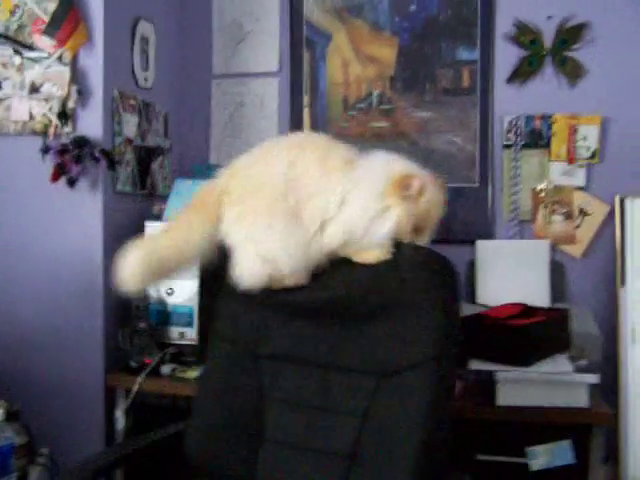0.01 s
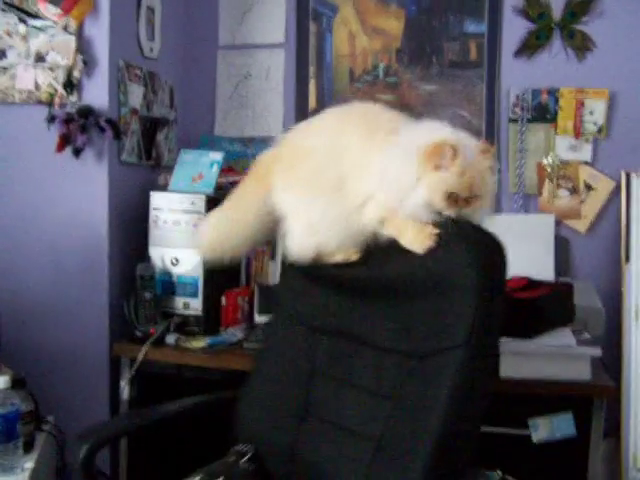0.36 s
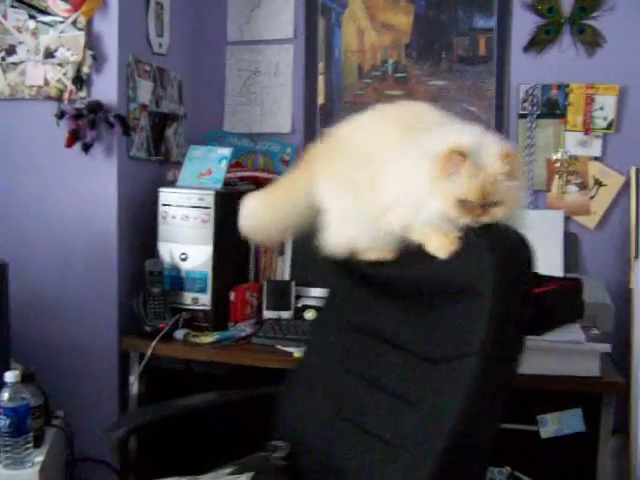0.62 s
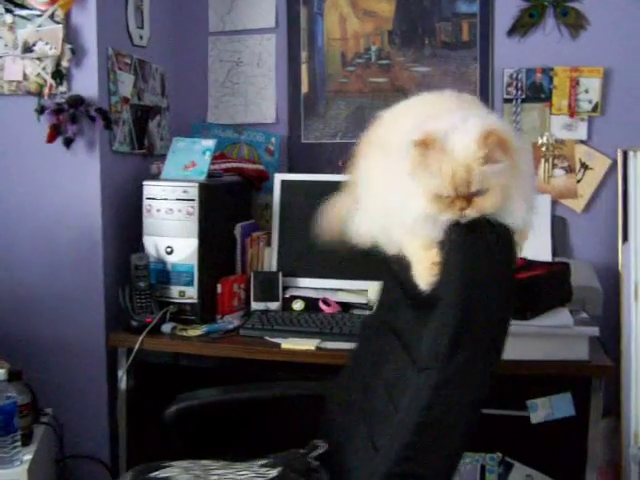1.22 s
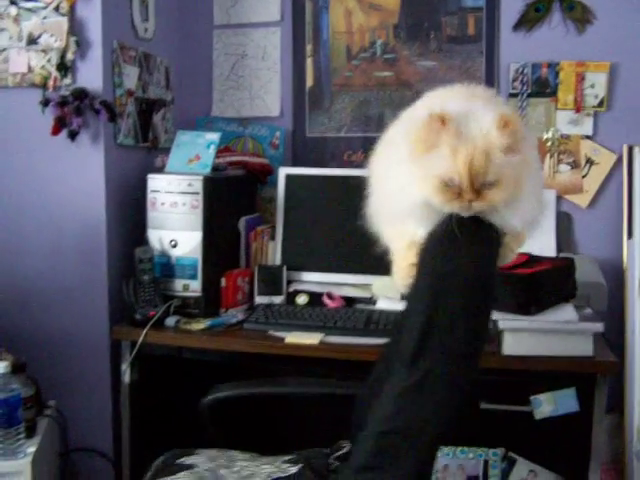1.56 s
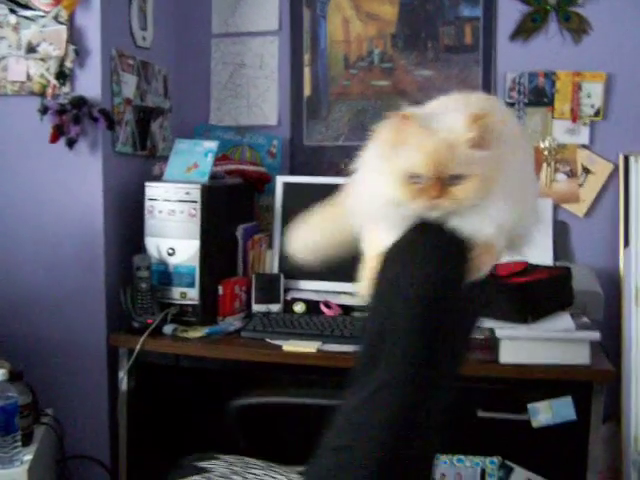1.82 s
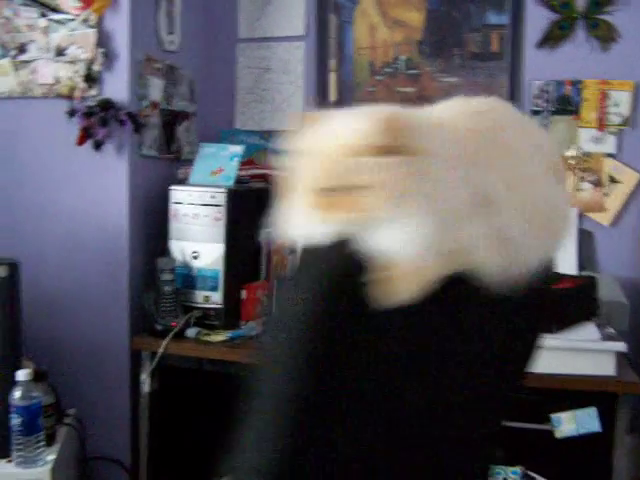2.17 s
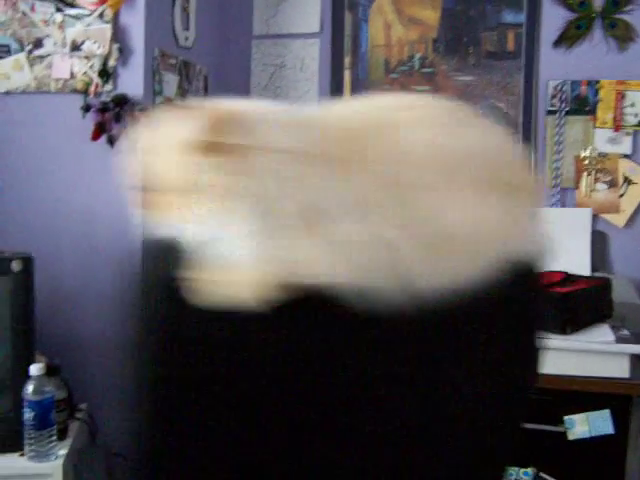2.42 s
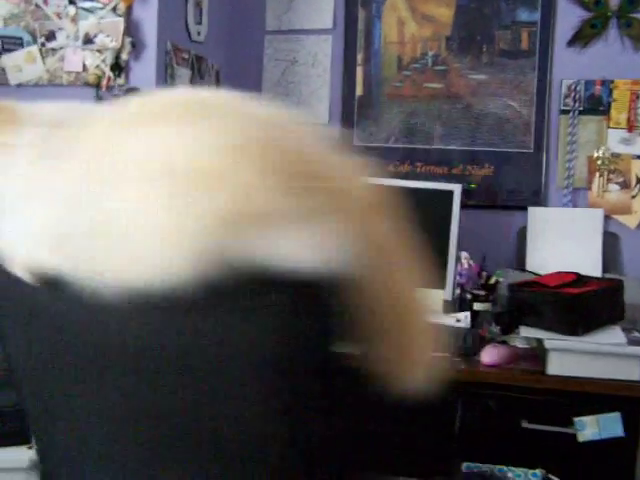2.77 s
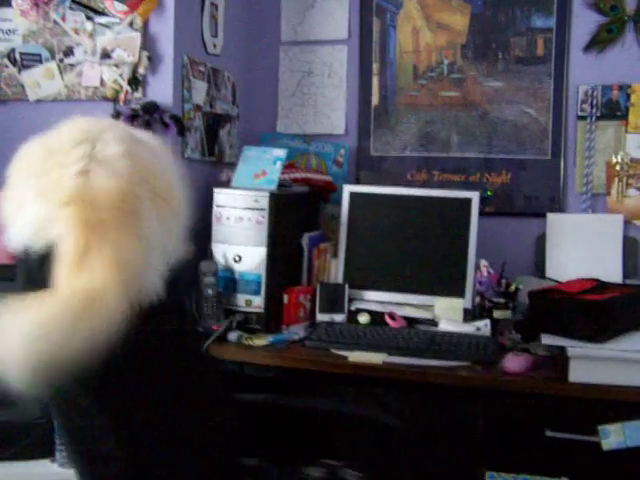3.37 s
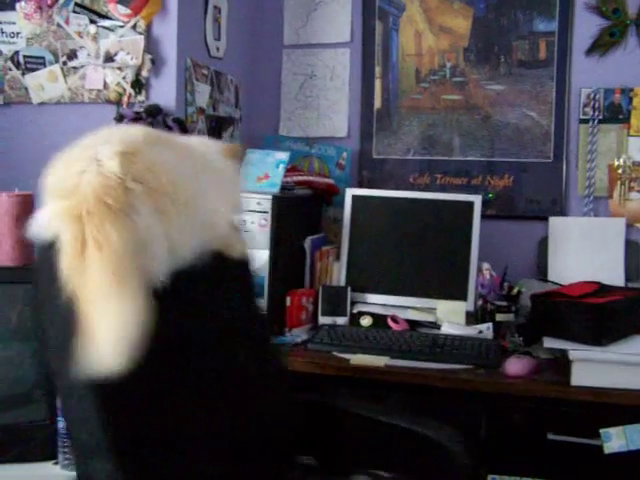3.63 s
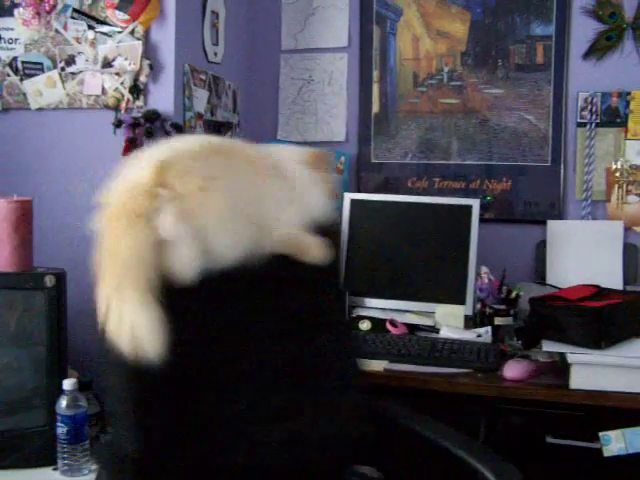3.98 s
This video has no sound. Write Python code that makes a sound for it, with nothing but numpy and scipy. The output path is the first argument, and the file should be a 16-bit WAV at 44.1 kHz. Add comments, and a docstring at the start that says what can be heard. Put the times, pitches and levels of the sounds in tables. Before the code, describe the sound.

A cat's claws scratch and pluck at an office chair's fabric from the start, in short irregular snags with soft scrapes and dull paw thumps. The strongest snags come near 1, 1.7 and 2.6 seconds. A last faint scrape fades as a sharp dry click sounds at the microphone at 3.2 seconds, followed by light bumps. Low hum and soft hiss fill the small room throughout.

```python
"""A cat clings to the back of an office chair that swivels in a small room.
Mains hum and soft hiss are present throughout. From the start, paws scrape over the cloth in tiny
frictional slips, and claws snag and pluck the upholstery, each snag leaving faint, brief ringing tones.
From 0.1 s, paws also thump the padded backrest. The loudest snags come near 1 s and 2.6 s.
A last soft scrape fades as dry clicks (3.2 s), then light bumps, sound right at the microphone."""
import sys
import numpy as np
from scipy import signal
from scipy.fft import rfft, irfft
from scipy.io import wavfile

SR = 44100
rng = np.random.default_rng(int(sys.argv[2]) if len(sys.argv) > 2 else 0)


def digitize_waveform(pressure):
    """Quantize a signal to 16-bit integers and store it at the path in sys.argv[1].

    Rows of a 2-D input are taken as channels; values are limited to [-1, 1].
    """
    field = np.atleast_2d(pressure).T
    bounded = np.clip(field, -1, 1)
    quanta = np.round(bounded * 32767).astype(np.int16)
    wavfile.write(sys.argv[1], SR, quanta)


N = 176400


def amp(db):
    return 10 ** (np.asarray(db) / 20)


def curve_at(points, hz):
    """Interpolation on a logarithmic frequency axis."""
    freqs, values = np.transpose(points)
    return np.interp(np.log(hz + 1), np.log(freqs + 1), values)


def add(mix, start_s, sound):
    """Superposition: a sound adds linearly to the mix."""
    part = mix[max(round(start_s * SR), 0):][:len(sound)]
    part += sound[:len(part)]


def colour(x, spectrum, tilt_db=0):
    """Spectral shaping with a tilt in dB per octave, normalised to rms 1."""
    hz = np.fft.rfftfreq(len(x), 1 / SR)
    shaped = irfft(rfft(x) * amp(curve_at(spectrum, hz) + tilt_db * np.log2(hz + 1)), len(x))
    return shaped / np.sqrt(np.mean(shaped ** 2) + 1e-20)


def damped_pulse(hz, q, cutoff_hz):
    """Impulse response of a heavily damped resonator, low-passed, with peak 1."""
    swing = signal.lfilter(*signal.iirpeak(hz, q, fs=SR), signal.unit_impulse(1024))
    swing = signal.lfilter(*signal.butter(4, min(cutoff_hz, SR / 3), fs=SR), swing)
    return swing / abs(swing).max()


def ring(modes):
    """Free vibration: a sum of exponentially decaying modes."""
    t = np.arange(SR // 5) / SR
    return sum(amp(db - 60 * t / t60) * np.sin(2 * np.pi * hz * t) for hz, db, t60 in modes)


# Reverberation time of the room: (frequency [Hz], T60 [s])
ROOM_T60 = [(150, 0.35), (500, 0.52), (1500, 0.34), (3500, 0.49), (8000, 0.44)]
def room(x, reverb_db):
    """Reverberation: direct sound plus decaying reflections, drawn anew for each call."""
    onset_s, early_s, early_db = 0.0017, 0.019, 5
    t = np.arange(SR // 2) / SR
    reflections = rng.choice([-1., 1.], len(t)) * (rng.random(len(t)) < .1)
    hz, frame_s, bands = signal.stft(reflections, SR, nperseg=256)
    decay = amp(-60 * frame_s / curve_at(ROOM_T60, hz)[:, None])
    tail = signal.istft(bands * decay, SR, nperseg=256)[1][:len(t)]
    tail *= np.minimum(t / onset_s, 1) ** 2 * (1 + amp(early_db) * np.exp(-t / early_s))
    tail = amp(reverb_db) * tail / np.linalg.norm(tail)
    return signal.fftconvolve(x, tail + (t == 0))


# Partials of the hum: (frequency [Hz], rms level [dB])
HUM_PARTIALS = [(119.8, -52.5), (239.6, -67.5), (359.4, -83)]
def mains_hum():
    """A harmonic series on twice the mains frequency, with random phases."""
    t = np.arange(N) / SR
    return sum(amp(db) * np.sqrt(2) * np.sin(2 * np.pi * (hz * t + rng.random()))
               for hz, db in HUM_PARTIALS)


# Spectrum of the hiss: (frequency [Hz], relative spectral density [dB])
HISS_SPECTRUM = [(10, -21.5), (24, -2), (34, 2.5), (45, 4.5), (65, -1.5), (100, -1.5), (190, -3.5),
                 (280, -5), (400, -7.5), (800, -11.5), (1500, -13), (2500, -13), (3700, -9.5),
                 (4600, -11.5), (5500, -17.5), (7100, -18), (8500, -28)]
def hiss(level_db=-54):
    """Stationary Gaussian noise, densest at low frequencies."""
    return amp(level_db) * colour(rng.standard_normal(N), HISS_SPECTRUM)


# Spectrum of rubbed cloth: (frequency [Hz], relative spectral density [dB])
CLOTH_SPECTRUM = [(60, -32), (150, -1), (250, 2), (450, -3), (700, 0), (1100, -2.5), (2000, -3.5),
                  (2800, -1.5), (3750, 1), (4700, -5), (5500, -10), (6800, -16), (8500, -29.5)]
# Paw strokes: (peak time [s], level [dB], rise width [s], fall width [s], tilt [dB/octave])
SCRAPES = [(.005, -39.5, 0.022, 0.021, 2), (.14, -48.5, 0.053, 0.053, 0.5), (0.231, -43, 0.02, 0.031, -0.5),
           (.44, -44, 0.072, 0.097, 0), (.62, -51, 0.067, 0.13, 3.5), (.79, -52, 0.11, 0.069, 0),
           (0.931, -47, 0.088, 0.079, 2), (.99, -36, 0.012, 0.013, -0.5), (1.06, -52, 0.05, 0.096, 1),
           (1.28, -51, 0.048, 0.026, -0.5), (1.455, -50, 0.048, 0.048, -1),
           (1.65, -47.5, 0.056, 0.066, -0.5), (1.789, -52, 0.035, 0.15, 1.5),
           (1.971, -51, 0.057, 0.059, -1), (2.421, -48.5, 0.14, 0.05, 1), (2.52, -44, 0.055, 0.041, 1),
           (2.592, -37.5, 0.012, 0.026, 0.5), (2.655, -51.5, 0.0091, 0.02, 0),
           (2.62, -36.5, 0.014, 0.019, -1), (2.615, -46, 0.035, .014, 9), (2.95, -56, 0.4, 0.25, 3.5)]
def cloth_scrapes(slips_per_s=3500, spread_db=2, reverb_db=-1.5):
    """Stick-slip friction: strokes of tiny slips swell and fade, from new places as the chair turns."""
    out, t = np.zeros(N), np.arange(N) / SR
    for peak_s, db, rise, fall, tilt_db in SCRAPES:
        sizes = amp(spread_db * np.minimum(rng.exponential(1, N), 4))
        slips = sizes * rng.choice([-1., 1.], N) * (rng.random(N) < slips_per_s / SR)
        stroke = np.exp(-((t - peak_s) / np.where(t < peak_s, rise, fall)) ** 2 / 2)
        add(out, 0, amp(db) * room(stroke * colour(slips, CLOTH_SPECTRUM, tilt_db), reverb_db))
    return out / np.hypot(1, amp(reverb_db))  # direct and reverberant powers add


# Faint, brief ringing tones of the chair frame after each snag: (frequency [Hz], relative level [dB], T60 [s])
RING_MODES = [(1680, -27.5, .15), (2047, -30.5, .22), (2332, -31, 0.15), (3100, -28, .18),
              (4430, -33.5, .2)]
# Claws snapping free of the weave: (time [s], level [dB], centre [Hz], reverberant/direct [dB])
SNAGS = [(.005, -31, 3520, -2), (.034, -41, 3500, -10), (.138, -34, 2200, 4), (.219, -35.5, 1320, 3),
         (0.2271, -27, 2630, 1), (.324, -35.5, 1800, 2), (0.4334, -30.5, 2200, 5.5),
         (.4362, -26.5, 2240, 2.5), (.4568, -31, 2510, -6), (0.478, -31, 2600, -3), (.500, -30, 2500, -1),
         (0.506, -28.5, 2240, 2), (0.6703, -27, 2580, -3.5), (0.6796, -28, 3100, 2),
         (.688, -29, 3000, -1.5), (0.8367, -23.5, 2700, 2), (0.8408, -34.5, 2000, 7.5),
         (0.9769, -16.5, 2500, -2), (.9801, -15.5, 2220, 2.5), (1.139, -35.5, 3450, -4),
         (1.276, -31, 3000, -2.5), (1.413, -38.5, 1500, 6), (1.7216, -24, 2000, 3.5),
         (1.7265, -25, 1840, 4), (1.7293, -23, 2660, 3), (1.7306, -21, 2630, 2), (1.969, -33.5, 2700, 5),
         (2.4267, -27, 2130, 3.5), (2.6474, -16.5, 1760, -2.5)]
def claw_snags(fibres_per_s=880, fibre_db=-21.5, fibre_decay_s=0.0099):
    """Sudden release of tension: a snap, then weaker fibres letting go; faint tones ring on briefly."""
    out, t = np.zeros(N), np.arange(SR // 10) / SR
    for start_s, db, hz, reverb_db in SNAGS:
        fibres = rng.standard_normal(len(t)) * (rng.random(len(t)) < fibres_per_s / SR)
        releases = (t == 0) + amp(fibre_db) * fibres * np.exp(-t / fibre_decay_s)
        snap = signal.fftconvolve(releases, damped_pulse(hz, q=1.15, cutoff_hz=2.09 * hz))
        add(out, start_s, amp(db) * room(snap, reverb_db))
        add(out, start_s, amp(db) * ring(RING_MODES))
    return out


# Modes of the backrest: (frequency [Hz], relative level [dB], T60 [s])
BACKREST_MODES = [(182, -29.5, 0.15), (309, -27.5, 0.099), (621, -20.5, 0.22)]
# Paws striking the backrest: (time [s], level [dB], centre [Hz])
THUMPS = [(.107, -40, 340), (.136, -40, 400), (.2195, -27, 744), (.223, -34, 300), (.2355, -31.5, 800),
          (.435, -36.5, 493), (.51, -36.5, 600), (.671, -33, 714), (0.835, -39.5, 278), (.8395, -30.5, 760),
          (0.9807, -29.5, 640), (1.142, -43.5, 620), (1.645, -45, 400), (1.7215, -29, 530),
          (1.7262, -27.5, 520), (1.797, -39, 547), (2.429, -31.5, 526), (2.618, -33, 545)]
def paw_thumps():
    """Damped impact: the padding gives a dull knock and the backrest rings faintly after it."""
    out = np.zeros(N)
    for start_s, db, hz in THUMPS:
        knock = damped_pulse(hz, q=1, cutoff_hz=2.94 * hz)
        add(out, start_s, amp(db) * room(knock, reverb_db=4))
        add(out, start_s, amp(db) * ring(BACKREST_MODES))
    return out


# Modes of a click: (frequency [Hz], relative level [dB], T60 [s])
CLICK_MODES = [(2320, -7.5, 0.012), (2750, -4, 0.0085), (3280, 2, .006), (3930, -0.5, 0.0063)]
# Clicks at the microphone: (time [s], level [dB])
CLICKS = [(3.2064, -31), (3.223, -36), (3.221, -17.5)]
def dry_clicks(rise_s=0.00061):
    """Direct field: briefly ringing modes, too close to carry any reverberation."""
    out, t = np.zeros(N), np.arange(SR // 5) / SR
    attack = 1 - np.exp(-(t / rise_s) ** 2)
    for start_s, db in CLICKS:
        add(out, start_s, amp(db) * ring(CLICK_MODES) * attack)
    return out


# Low and high modes of the case: (frequency [Hz], relative level [dB], T60 [s])
CASE_LOW_MODES = [(150, -8, 0.045), (286, -4, 0.044), (508, -4.5, 0.034)]
CASE_HIGH_MODES = [(2050, -4, 0.028), (2960, -3, .02), (4400, -1, 0.023)]
# Bumps on the case: (time [s], level [dB], gain of the low modes [dB])
BUMPS = [(3.3424, -41, 2.5), (3.3517, -51.5, 12), (3.3796, -45, -8)]
def case_bumps():
    """Modal excitation: each light bump rings the case at the microphone with its own balance."""
    out = np.zeros(N)
    for start_s, db, low_db in BUMPS:
        add(out, start_s, amp(db) * (ring(CASE_HIGH_MODES) + amp(low_db) * ring(CASE_LOW_MODES)))
    return out


def scene():
    """All sources superpose at one microphone, alike in both channels."""
    mono = mains_hum() + hiss() + cloth_scrapes() + claw_snags() + paw_thumps()
    mono += dry_clicks() + case_bumps()
    return np.array([mono, mono])


# Frequency response of the microphone: (frequency [Hz], gain [dB])
MIC_RESPONSE = [(20, -1), (7000, 0), (7700, -1.5), (8200, -5.5), (8700, -11)]
def record(dry):
    """Linear filtering: the microphone's treble roll-off, then a steep band limit."""
    mic_gain = amp(curve_at(MIC_RESPONSE, np.fft.rfftfreq(2 * N, 1 / SR)))
    dull = irfft(rfft(dry, 2 * N) * mic_gain)[:, :N]
    band_limit = signal.firwin(301, cutoff=8800, window=("kaiser", 9), fs=SR)
    return signal.oaconvolve(dull, band_limit[None], "same")


dry = scene()
out = record(dry)
digitize_waveform(out)
```